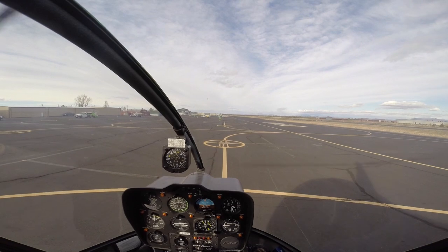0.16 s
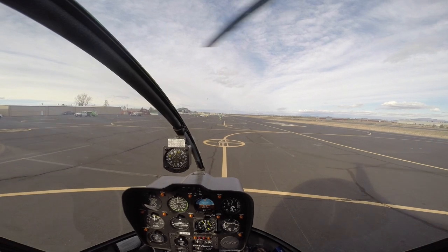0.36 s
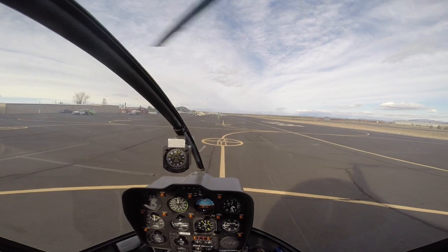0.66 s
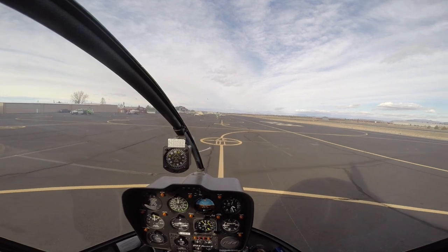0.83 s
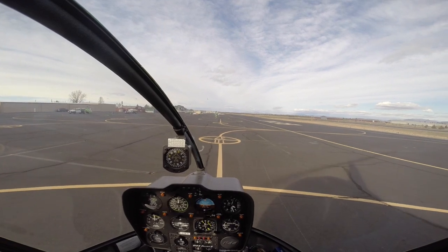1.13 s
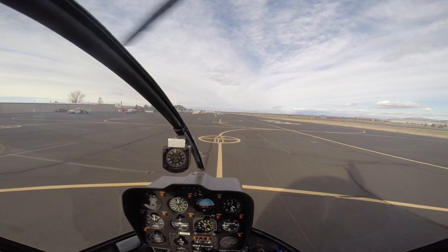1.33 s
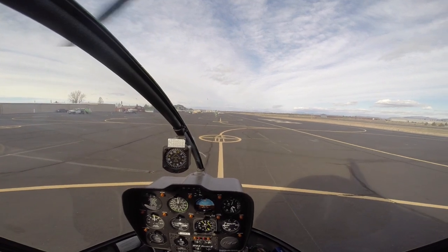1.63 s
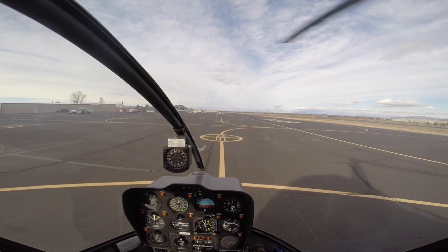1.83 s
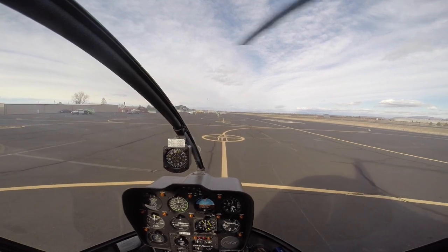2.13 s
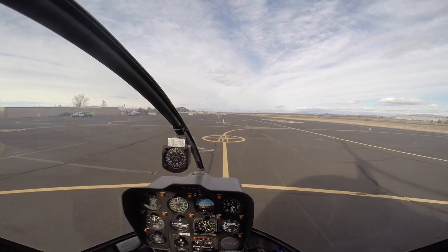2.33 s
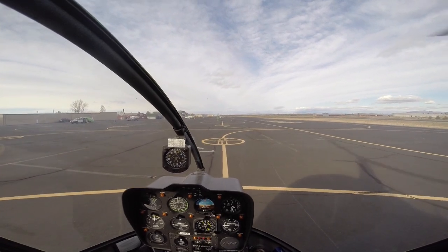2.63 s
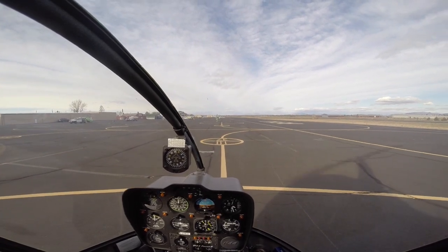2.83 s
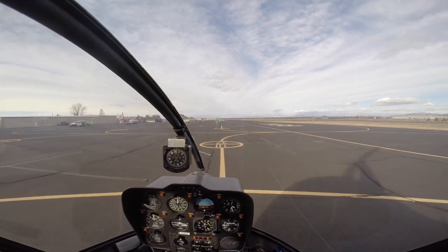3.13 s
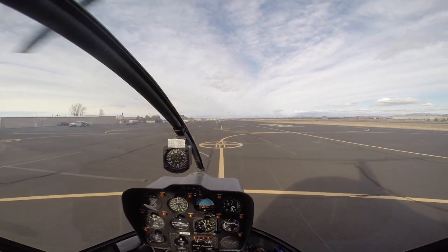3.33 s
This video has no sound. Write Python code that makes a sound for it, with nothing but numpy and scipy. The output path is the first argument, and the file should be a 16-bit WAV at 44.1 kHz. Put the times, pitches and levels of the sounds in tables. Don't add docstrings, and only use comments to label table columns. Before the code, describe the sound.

A light helicopter idles at flight speed on the ground, heard inside the cockpit: constant low engine boom, rapid blunt rotor thumps and airy rumble, all muffled by a sealed camera with faint hiss and whine.

```python
import sys
import numpy as np
from scipy import signal
from scipy.fft import rfft, irfft, next_fast_len
from scipy.io import wavfile
from scipy.ndimage import map_coordinates

SR = 44100
rng = np.random.default_rng(int(sys.argv[2]) if len(sys.argv) > 2 else 0)


def transcribe(signal):
    frames = np.atleast_2d(signal).T
    limited = np.clip(frames, -1, 1)
    pcm = np.round(limited * 32767).astype(np.int16)
    wavfile.write(sys.argv[1], SR, pcm)


def voltage_ratio(decibels):
    exponent = np.asarray(decibels, float) / 20
    return 10 ** exponent


N = 152586

CYLINDERS, FIRINGS_PER_BLADE = 6, 10
SLAP_LAG_RAD = 0.8


def wobble(knots_per_s):
    coarse = np.arange(0, N + 64, 64)
    knots = rng.standard_normal(int(N * knots_per_s / SR) + 4)
    curve = map_coordinates(knots, [coarse * knots_per_s / SR])
    return np.interp(np.arange(N), coarse, curve)


def rush(spectrum, gain=1):
    size = next_fast_len(N + 8192)
    hz, level_db = np.transpose(spectrum)
    bin_hz = np.fft.rfftfreq(size, 1 / SR)
    colour = voltage_ratio(np.interp(np.log(bin_hz + 1), np.log(hz + 1), level_db))
    white = rng.standard_normal(N) * gain / np.sqrt(np.mean(np.square(gain)))
    return irfft(rfft(white, size) * colour, size)[:N] * np.sqrt(SR / 2)


def tone(level_db, phase):
    return np.sqrt(2) * voltage_ratio(level_db) * np.cos(phase)


def stack(orders, angle, shift, sway_db, drift):
    total = np.zeros(N)
    for k, level_db in orders:
        level_db = level_db + sway_db * wobble(2.4)
        total += tone(level_db, k * angle + shift(k) + drift * k * wobble(5.3))
    return total


# time in seconds, firing rate in Hz.
SPEED = [(0.0, 135.96), (0.5, 136.16), (1.0, 136.12), (1.5, 135.71), (2.0, 135.58), (2.5, 135.77),
         (3.0, 135.74), (3.46, 136.16)]


def firings():
    s, hz = np.transpose(SPEED)
    firing_hz = np.interp(np.arange(N) / SR, s, hz)
    return 2 * np.pi * (-0.177 + np.cumsum(firing_hz) / SR)


# multiple of the engine cycle, level in dB.
CYLINDER_ORDERS = [(1, -49), (2, -48), (3, -51), (4, -54), (5, -51), (7, -46), (8, -47), (9, -57),
                   (10, -70), (11, -61), (12, -63), (13, -64), (14, -60), (15, -59), (16, -66), (17, -67),
                   (18, -66), (19, -82), (20, -71), (21, -75), (22, -77), (24, -85), (28, -83), (30, -84),
                   (32, -86), (33, -83), (36, -88), (39, -93), (40, -93)]
# frequency in Hz, density in dB per Hz.
ROAR = [(250, -125), (450, -85.5), (750, -95.5), (900, -102), (1500, -104.5), (1900, -111), (3500, -117),
        (7000, -130)]


def engine(fire):
    def pipe_shift(k):
        return 3.6 * (k > 8.5) - 0.8

    boom = stack([(1, -29)], fire, lambda k: 0, sway_db=0.3, drift=0.03)
    lope = stack(CYLINDER_ORDERS, fire / CYLINDERS, pipe_shift, sway_db=0.7, drift=0.01)
    gate = 1 + 0.1 * np.cos(fire) + 0.12 * np.cos(fire / 3)
    gate += 0.15 * np.cos(fire / FIRINGS_PER_BLADE - SLAP_LAG_RAD)
    flicker_db = 0.4 * wobble(6) + 0.9 * wobble(40)
    return boom + lope + rush(ROAR, gate * voltage_ratio(flicker_db))


def cabin_shift(k):
    return min(2.5, 5.8 - 3.8 * np.log(k))


# multiple of the pass rate, level in dB.
BLADE_ORDERS = [(1, -55), (2, -49), (3, -56), (4, -42), (6, -52), (7, -64), (8, -52), (9, -57), (11, -46),
                (12, -52), (13, -57), (14, -52), (16, -64), (17, -68), (18, -71), (19, -62), (21, -60),
                (22, -62), (23, -67), (24, -63), (26, -68)]


def rotor(blade):
    return stack(BLADE_ORDERS, blade, cabin_shift, sway_db=0.7, drift=0.01)


# multiple of the shaft rate, level in dB.
BELT_ORDERS = [(3, -54), (4, -44), (5, -51), (6, -56), (18, -57)]


def belt_shaft(blade):
    speed_ratio, in_step_s = 0.9842, 0.7
    meet = blade[round(in_step_s * SR)]
    shaft = meet + speed_ratio * (blade - meet)
    return stack(BELT_ORDERS, shaft, cabin_shift, sway_db=1.2, drift=0.04)


# frequency in Hz, density in dB per Hz.
RUMBLE = [(12, -78), (30, -62.5), (75, -62.5), (150, -62.5), (195, -68), (250, -67), (420, -81.5),
          (2200, -145)]


def downwash(blade):
    slap = 1 + 0.2 * np.cos(blade - SLAP_LAG_RAD)
    gust_db = 0.59 * wobble(2) + 0.72 * wobble(16)
    return rush(RUMBLE, slap * voltage_ratio(gust_db))


# multiple of the firing rate, unsteadiness in Hz, level in dB.
GEARS = [(.267, .4, -54), (.606, .3, -55), (.9733, .4, -55), (.9903, .3, -56), (1.79, 3.5, -61),
         (8.0, 10, -86), (17.0, 6, -97)]


def gears(fire):
    total = np.zeros(N)
    for k, wide_hz, level_db in GEARS:
        flicker_db = (2.5 + wide_hz / 5) * wobble(3 + wide_hz)
        wander_turns = rng.random() + np.cumsum(wide_hz * wobble(1 + 3 * wide_hz)) / SR
        total += tone(level_db + flicker_db, k * fire + 2 * np.pi * wander_turns)
    return total


# frequency in Hz, density in dB per Hz.
HISS = [(500, -135), (1000, -115), (2000, -113), (5000, -112.8), (12000, -112.8), (13000, -114.5),
        (14800, -113.5), (15200, -119)]
# overtone, level in dB.
WHINE = [(1, -87), (2, -85), (3, -82.5), (4, -82), (5, -80.5)]


def camera():
    frame_hz, lines_per_frame, frame_start = 30000 / 1001, 97.645, 0.66
    frame_part = (np.arange(N) / SR * frame_hz + frame_start) % 1
    lines = lines_per_frame * frame_part
    whine = sum(np.sqrt(2) * voltage_ratio(db) * np.sin(2 * np.pi * k * lines) for k, db in WHINE)
    return rush(HISS) + whine


# time in seconds, level in dB, pitch in Hz, length in seconds.
BUFFETS = [
    (2.321, -34.5, 33.8, 0.039),
    (3.376, -31.5, 41.5, 0.11),
]


def buffets():
    t = np.arange(N) / SR
    total = np.zeros(N)
    for s, level_db, hz, length_s in BUFFETS:
        swell = np.exp(-((t - s) / length_s) ** 2)
        total += swell * tone(level_db, 2 * np.pi * hz * (t - s))
    return total


def scene():
    fire = firings()
    blade = fire / FIRINGS_PER_BLADE
    drive = engine(fire) + rotor(blade) + belt_shaft(blade) + downwash(blade) + gears(fire)
    return (drive + camera() + buffets())[None]


def top_cut(x):
    return signal.sosfilt(signal.butter(12, 15270, fs=SR, output="sos"), x)


def record(dry):
    return top_cut(dry)


dry = scene()
out = record(dry)
transcribe(out)
```